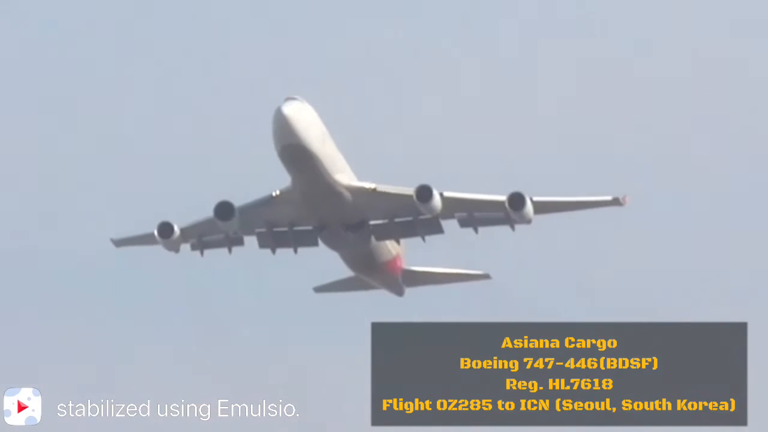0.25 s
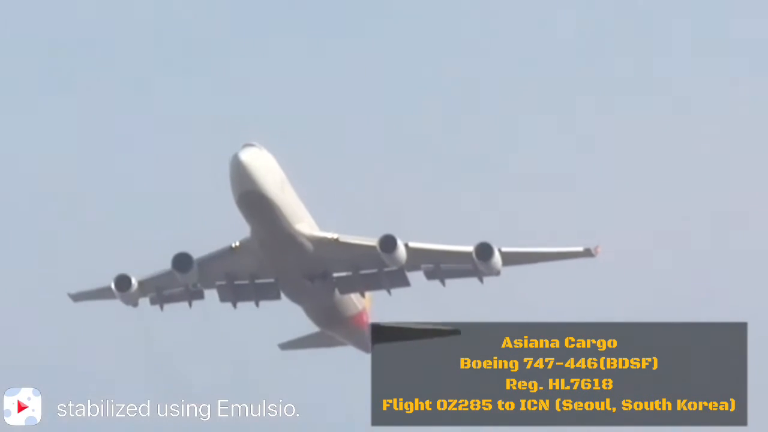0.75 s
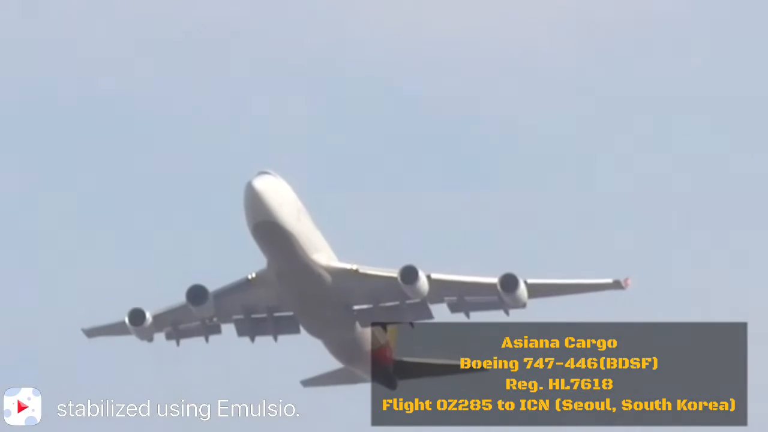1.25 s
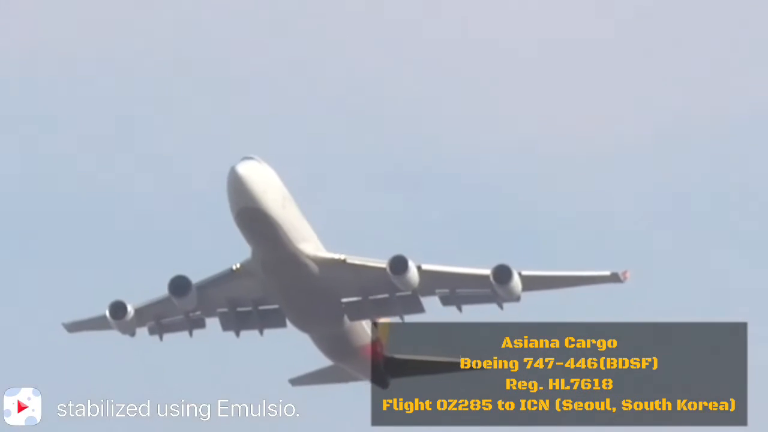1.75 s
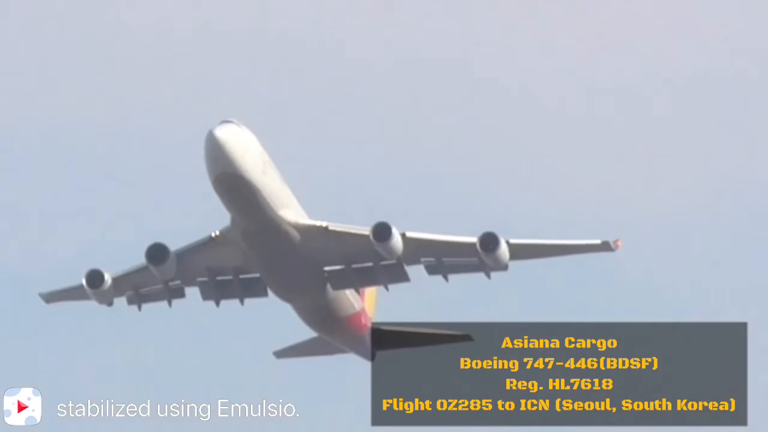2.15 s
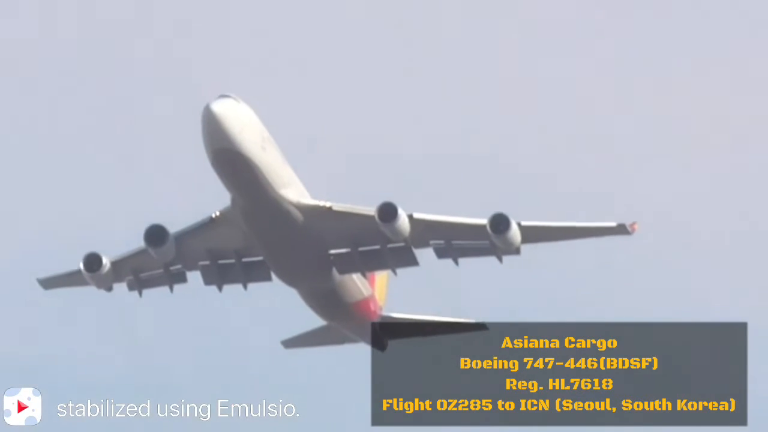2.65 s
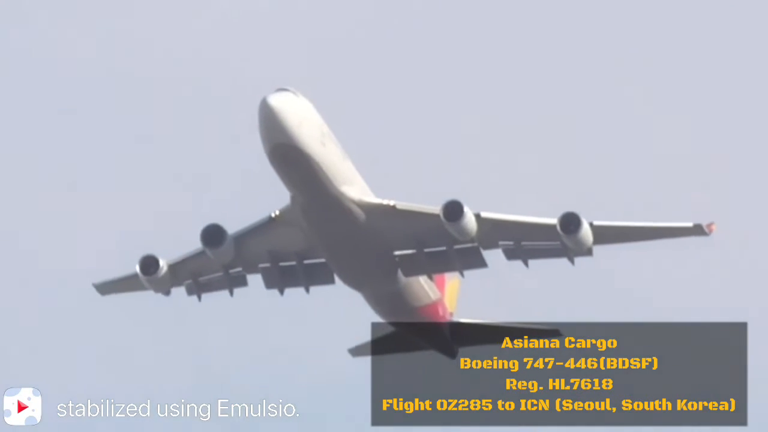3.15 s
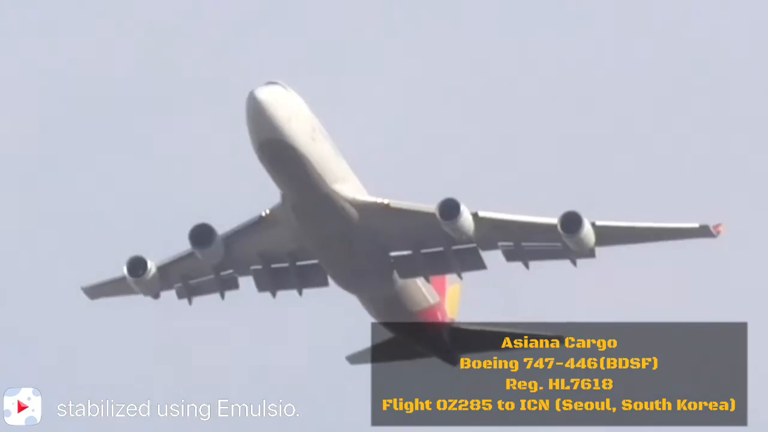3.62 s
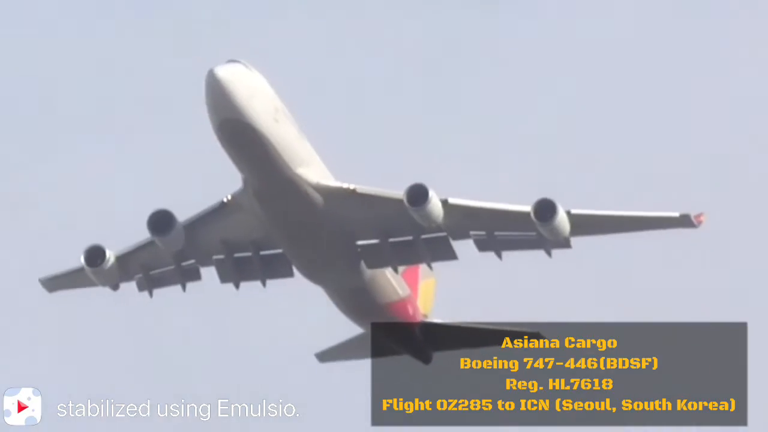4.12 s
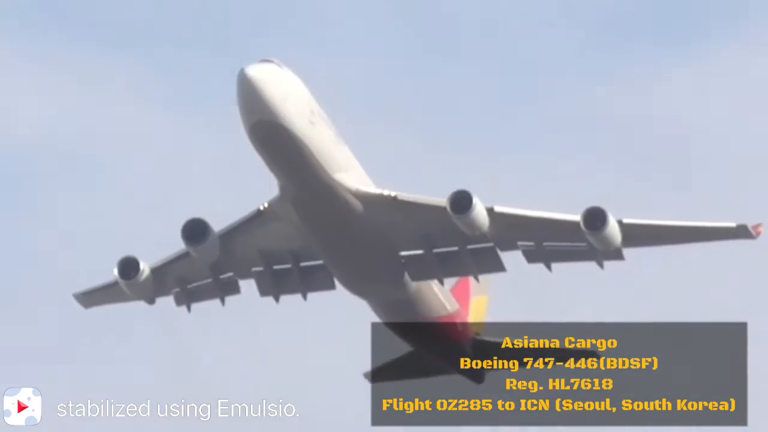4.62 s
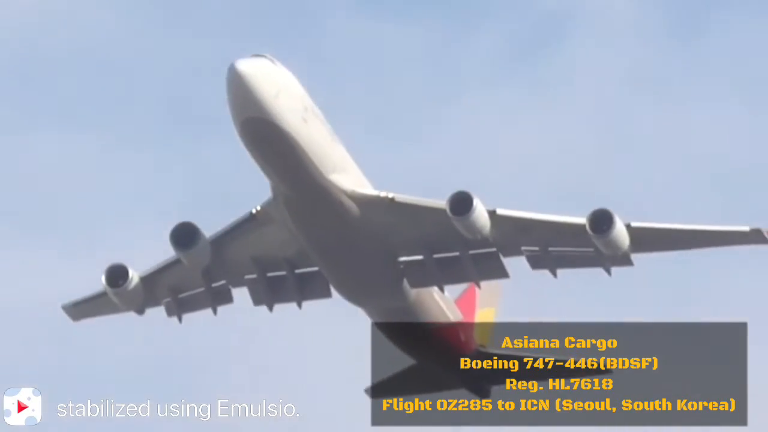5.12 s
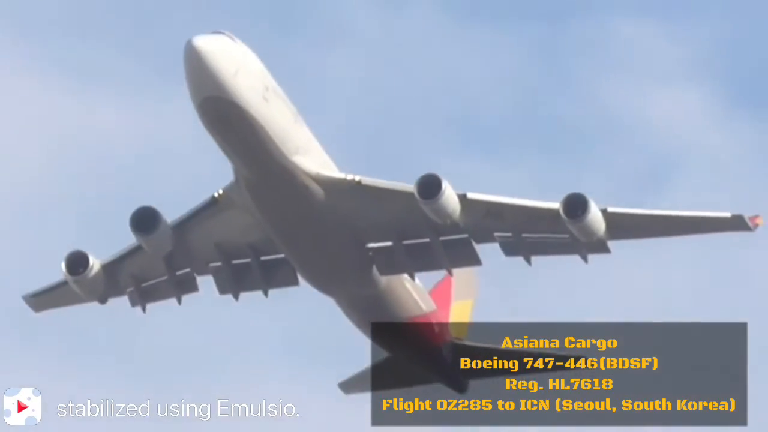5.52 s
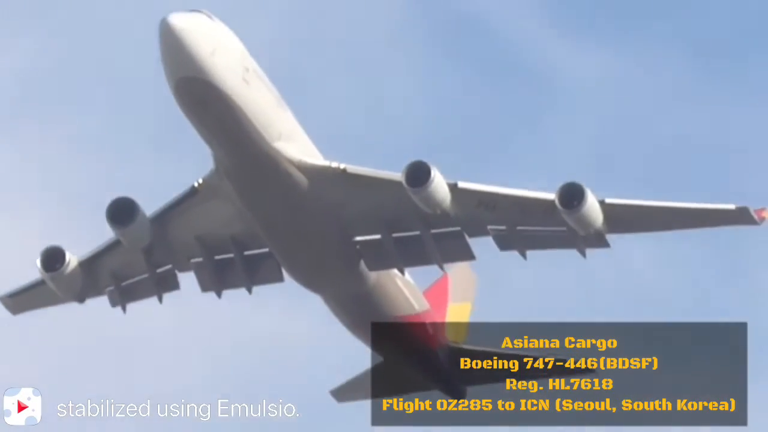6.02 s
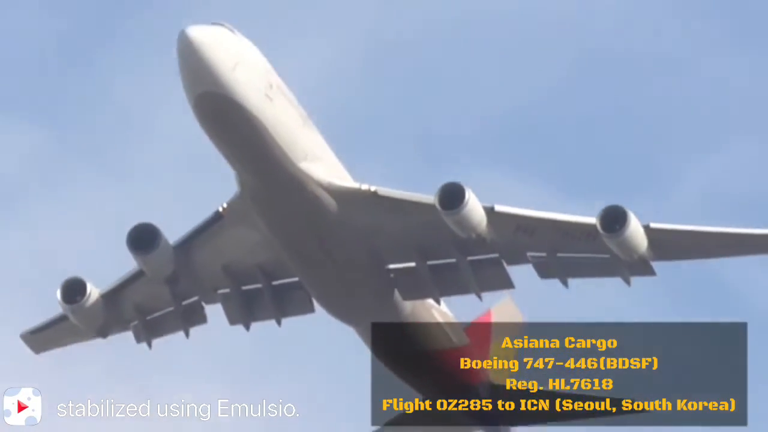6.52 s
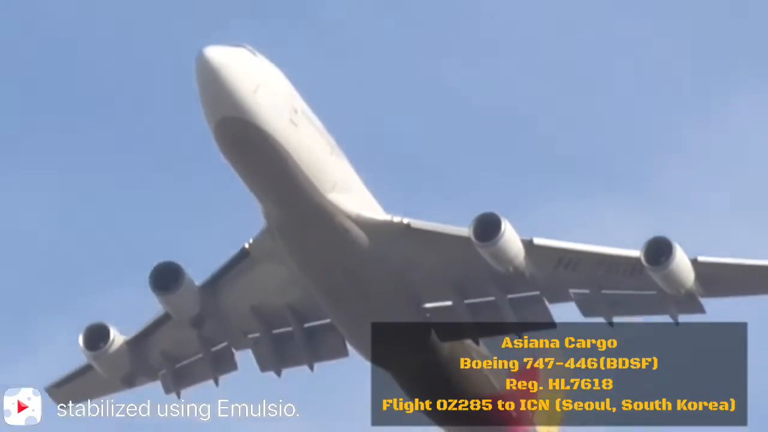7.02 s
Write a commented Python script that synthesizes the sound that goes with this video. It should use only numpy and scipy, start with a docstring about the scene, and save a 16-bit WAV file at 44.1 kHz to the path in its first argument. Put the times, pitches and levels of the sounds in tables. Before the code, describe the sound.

A large four-engine jet climbs toward a listener outdoors. In the first 0.2 seconds, three very faint, high falling chirps, perhaps a small bird, sit over a distant, muffled rumble slightly to the left. A low hum near 115 hertz beats in slow swells, dipping around 0.6 and 2.3 seconds and sagging a little in pitch. From about 2.5 seconds the roar thickens and moves to the centre; by 4 to 5 seconds it is heavy, deep and turbulent, with a shifting hollow colour from the ground echo. The hum fades near 4.3 and returns around 5. Tiny dry ticks fall at 5.05. Around 6 to 6.3 a brighter rush surges with faint mid and high turbine whines, which flicker again until 7.2. Thin hiss stays throughout, and the roar is still loud at the end.

```python
"""A jet's roar swells as the aircraft climbs towards a listener in the open and nears overhead.
The roar is one turbulent noise, split into bands that swell apart, with a ground echo a few milliseconds late.
A shaft hum, one tone under a beating level curve, sags in pitch; faint blade tones, sines, flare late.
Filtered noise gives a scattered roar and a thin hiss; swept sines give chirps, filtered impulses give ticks."""
import sys
import numpy as np
from scipy import signal
from scipy.fft import rfft, irfft, next_fast_len
from scipy.io import wavfile
from scipy.ndimage import uniform_filter1d, map_coordinates

SR = 44100
rng = np.random.default_rng(int(sys.argv[2]) if len(sys.argv) > 2 else 0)


def materialize(psi):
    """Save the field psi as 16-bit PCM at rate SR to the path in sys.argv[1].

    A 1-D psi becomes a single channel; in a 2-D psi each row is a channel.
    """
    bounded = np.clip(np.atleast_2d(psi).T, -1, 1)
    quanta = np.round(bounded * 32767).astype(np.int16)
    wavfile.write(sys.argv[1], SR, quanta)


def amplitude_ratio(level_db):
    """Convert a level in decibels to the matching linear amplitude (field) ratio."""
    exponent = np.asarray(level_db, float) / 20
    return 10 ** exponent


N = 320607

# Spectrum of the jet noise after the long way through air; each part is levelled later:
# (frequency [Hz], relative density [dB per Hz])
JET_SPECTRUM = [(15, -39), (30, -38), (55, -14.5), (90, -0.5), (180, 1), (300, 3.5), (500, -3.5),
                (800, -10.5), (1300, -23), (1700, -31), (2100, -28.5), (2300, -34), (2600, -40.5),
                (3200, -58.5), (5000, -78.5)]
# Where one part of the jet noise hands over to the next: (frequency [Hz])
HANDOVER_HZ = [60, 115, 215, 430, 972, 1290, 1680, 2250]
# The two deepest parts: (time [s], lowest throb [dB], deep rumble [dB])
DEEP_LEVELS = [(0, -51, -46), (.9, -53, -47.5), (2, -44, -43.5), (2.8, -41, -39.5), (3.3, -44, -39),
               (3.8, -46, -33), (4.3, -42, -32), (4.46, -46, -46), (4.65, -42, -36), (5.3, -40, -25.5),
               (6.05, -43, -29), (6.4, -41, -31), (7.2, -43, -30)]
# The middle parts: (time [s], exhaust boom [dB], exhaust rumble [dB], jet roar [dB], core rush [dB])
ENGINE_LEVELS = [(0, -44, -30, -30, -44), (.25, -35, -29.5, -25, -41.5), (.5, -39, -28, -30.5, -35.5),
                 (1.1, -36, -34.5, -30.5, -38.5), (1.75, -36.5, -30, -30, -35.5),
                 (2.05, -32, -28.5, -27, -36), (2.35, -34.5, -23, -24, -36), (2.8, -30.5, -27.5, -28, -34),
                 (3.3, -26, -26.5, -23, -38.5), (3.6, -31.5, -20.5, -24, -33.5),
                 (3.9, -23.5, -20, -21, -31), (4.5, -18.5, -23, -20, -30), (4.9, -20.5, -22.5, -20, -30),
                 (5.4, -23, -22.5, -22, -32), (5.85, -23.5, -22, -22, -34.5),
                 (6.1, -24.5, -25.5, -25.5, -27.5), (6.25, -26.5, -21, -18, -33),
                 (6.5, -25.5, -18.5, -19, -29.5), (6.9, -24, -19, -21.5, -32), (7.25, -21, -20.5, -21, -32)]
# The bright edge of the rush: (time [s], level [dB])
BRIGHT_LEVEL = [(0, -43.5), (1, -45.5), (2, -44.5), (3, -42), (3.9, -38.5), (4.6, -38.5), (5.3, -38),
                (5.9, -39.5), (6.4, -36.5), (6.8, -38), (7.27, -36)]
# The two top parts lie this far under the bright edge [dB]
TOP_UNDER_DB = (14, 17.5)
# Turbulent air shakes each part on its own, lowest part first: (depth [dB], rate [knots per s])
TURBULENT_SHAKE = [(.5, 5.6), (.5, 4.9), (.5, 7.2), (0.6, 17), (0.599, 13), (0.5, 10), (0.601, 12),
                   (.6, 12), (.6, 12)]
# One bright surge as the air briefly carries the treble better: time, standard deviation [s],
# lift of roar, rush, bright edge and the two top parts [dB]
SURGE_S, SURGE_SPREAD_S, SURGE_DB = 6.205, 0.055, (1.5, 6, 8, 9.5, 4.5)

# Ground echo, later as the aircraft rises and in step only for a while:
# (time [s], delay [ms], strength [0-1])
GROUND_ECHO = [(0, 1.6, .04), (3.8, 2.1, .1), (4.2, 2.28, .65), (4.6, 2.45, .7), (5.1, 2.78, .6),
               (5.5, 2.92, .7), (5.9, 3.1, .6), (6.3, 3.35, .65), (6.65, 3.5, .4), (6.9, 3.7, .15),
               (7.27, 3.9, .15)]
# Turbulent air makes the delay wander [ms, knots per s]; soft soil turns the phase back [rad]
ECHO_WANDER_MS, ECHO_WANDER_RATE, SOIL_LAG_RAD = .09, 7, 0.76

# Flares of the blade tones: (time [s], frequency [Hz], peak level [dB], standard deviation [s])
BLADE_FLARES = [(4.87, 1028, -41, .05), (5.95, 1022, -41, .08), (5.99, 2985, -63, .05),
                (6.06, 1100, -39, .07), (6.13, 1180, -40, .06), (6.17, 2985, -52.5, .025),
                (6.18, 2815, -61, .025), (6.2, 1100, -34, .06), (6.26, 1022, -35.5, .07),
                (6.27, 2985, -63, .025), (6.57, 2982, -60, .045), (6.62, 1022, -37, .05),
                (6.75, 2975, -61, .025), (6.91, 2978, -56, .035), (7.08, 2815, -64, .04),
                (7.15, 2992, -61, .06)]
# Faint fan whistle: frequency [Hz], level [dB], start of its one-second fade-in [s]
WHISTLE_HZ, WHISTLE_DB, WHISTLE_FROM_S = 2982, -75, 4.8

# Shaft hum, its beats included: (time [s], level [dB])
HUM_LEVEL = [(0, -31.5), (.45, -34), (.62, -45.5), (.78, -32.5), (1.05, -31), (1.25, -35.5), (1.5, -29),
             (2.1, -33), (2.32, -47), (2.55, -28), (3.3, -26), (3.55, -28), (3.85, -39), (4.3, -50),
             (4.65, -37), (4.9, -26), (5.1, -27.5), (5.35, -28.5), (5.95, -25.5), (6.3, -37), (7.2, -34)]
# Part of the hum that is opposite at the two ears: (time [s], level [dB])
HUM_OPPOSED = [(0, -61), (.5, -49), (.95, -64), (1.5, -53), (2.1, -40), (2.4, -48), (2.55, -64.5),
               (7.27, -64)]
# Sag from first to settled pitch [Hz, Hz], time constant [s]; phase lead of the left ear [rad]
HUM_START_HZ, HUM_SETTLED_HZ, HUM_SAG_S, HUM_LEAD_RAD = 117.3, 112.55, 1.1, -.05
# Pitch waver at first [Hz] and its growth as the aircraft nears [Hz per s]
HUM_WAVER_HZ, HUM_WAVER_HZ_PER_S = 0.24, 0.21
# Octave against the hum at first [dB] and its loss [dB per s]
OCTAVE_DB, OCTAVE_FADE_DB_PER_S = 0, 6
# Third harmonic: peak amplitude [dB], time [s], standard deviation [s]
THIRD_DB, THIRD_S, THIRD_SPREAD_S = -32, 2.82, .35

# Sound scattered by the surroundings: (time [s], level [dB])
SCATTER_LEVEL = [(0, -33), (1.5, -33.5), (3, -33), (4.5, -39.5), (5.5, -30), (6.3, -37.5), (7.27, -39.5)]
# Its spectral shape: (frequency [Hz], relative density [dB per Hz])
SCATTER_SPECTRUM = [(15, -55.5), (25, -20), (103, -15), (256, -4.5), (325, -1.5), (591, -1), (952, -3.5),
                    (1390, -8), (1760, -21.5), (2900, -29), (3770, -60), (6380, -120)]

# The aircraft starts off to the left: right ear late [ms], treble louder at the left [dB],
# until it is straight ahead [s]
LATE_MS, SHADOW_DB, AHEAD_S = .035, 3.2, 2.9

# Hiss before a common lift: (time [s], low part [dB], high part [dB])
HISS_LEVELS = [(0, -62, -63), (.9, -60.5, -60.5), (1.53, -57.5, -59.5), (2.24, -58, -62),
               (2.44, -56, -56.5), (3.55, -58, -57.5), (4.0, -57.5, -60.5), (4.25, -56, -60),
               (4.95, -57.5, -62.5), (5.8, -59.5, -62), (6.15, -58, -61), (6.4, -60.5, -64.5),
               (7.1, -58, -62), (7.25, -57, -58.5)]
# Spectral shape of the hiss at the left: (frequency [Hz], relative density [dB per Hz])
HISS_LEFT_SPECTRUM = [(1500, -29), (2600, 2.5), (3200, 2.5), (4000, 1), (5000, -4.5), (6000, -5.5),
                      (7500, -3.5), (9000, -10), (11000, -17.5), (13000, -23), (15500, -32)]
# Spectral shape of the hiss at the right: (frequency [Hz], relative density [dB per Hz])
HISS_RIGHT_SPECTRUM = [(1500, -26), (2600, 1.5), (3200, 4), (4000, -1.5), (5000, -8.5), (6000, -16.5),
                       (7500, -9), (9000, -9.5), (11000, -18), (13000, -21), (15500, -28)]
# Left-right likeness of the noise behind the hiss: (frequency [Hz], correlation)
HISS_LIKENESS = [(2500, .7), (4000, 0.27), (5500, .2), (7500, 0.4), (9000, .1), (11000, .1), (14000, .3)]
# The hiss leans left at first (low, high part [dB]) and centres between these times [s]
LEAN_LOW_DB, LEAN_HIGH_DB, CENTRES_S = 5.5, 2.5, (2, 3.6)

# Small close ticks: (time [s], impulse height before filtering [dB])
TICK_IMPULSES = [(5.0465, -26.5), (5.0485, -32), (5.0515, -25.5)]
# Faint high chirps, perhaps a small bird:
# (time [s], length [s], first frequency [Hz], last frequency [Hz], level [dB])
CHIRP_SWEEPS = [(.008, .09, 10800, 10450, -72.5), (.09, .035, 11100, 10800, -69),
                (.195, .025, 8500, 8250, -68)]


def unit(x):
    """Normalisation: scaled to rms 1 along time."""
    return x / np.sqrt(np.mean(x ** 2, axis=-1, keepdims=True) + 1e-20)


def along(points, hz):
    """Interpolation of (frequency, value) points on a logarithmic frequency axis."""
    f, v = np.transpose(points)
    return np.interp(np.log(hz + 1), np.log(f + 1), v)


def seconds():
    """Time of every sample."""
    return np.arange(N) / SR


def curves(rows):
    """Linear interpolation in time: one value per sample for each column after the time."""
    s, *columns = np.transpose(rows)
    return [np.interp(seconds(), s, column) for column in columns]


def bump(s, spread_s):
    """Gaussian bell of height 1 in time."""
    return np.exp(-((seconds() - s) / spread_s) ** 2 / 2)


def wobble(rate):
    """Smooth random modulation: a spline through random knots, rate knots a second."""
    knots = rng.standard_normal(int(N * rate / SR) + 4)
    return map_coordinates(knots, [np.arange(N) * rate / SR])


def filtered(x, response):
    """Linear filtering: the spectrum of x times a response of frequency."""
    m = next_fast_len(N + 8192)
    return irfft(rfft(x, m) * response(np.fft.rfftfreq(m, 1 / SR)), m)[..., :N]


def above(hz, edge_hz, steep):
    """High-pass gain: a smooth step from 0 to 1 at the edge."""
    return 1 - 1 / (1 + (hz / edge_hz) ** steep)


def delayed(x, ms):
    """Propagation delay: x heard ms later; the delay may glide."""
    return map_coordinates(x, [np.arange(N) - ms * SR / 1000], order=3, mode="reflect")


def patchy(patchy_db, channels):
    """White noise whose gain drifts in patches of pitch and time, as turbulent air does to far sound."""
    z = signal.stft(rng.standard_normal((channels, N)), nperseg=512)[2]
    field = uniform_filter1d(rng.standard_normal(z.shape[1:]), size=5, axis=0)
    field = uniform_filter1d(field, size=14, axis=1)
    return signal.istft(z * amplitude_ratio(patchy_db * field / field.std()), nperseg=512)[1][:, :N]


def jet():
    """Turbulent mixing noise: parts of one noise, deep to top, swell apart as angle and air change."""
    noise = filtered(patchy(patchy_db=0.61, channels=1)[0], lambda hz: amplitude_ratio(along(JET_SPECTRUM, hz)))
    noise = with_ground(noise)
    # differences of successive low-passes are the bands
    lows = [filtered(noise, lambda hz: 1 - above(hz, edge, steep=8.55)) for edge in HANDOVER_HZ]
    parts = np.diff([0 * noise, *lows, noise], axis=0)
    lower_db = curves(DEEP_LEVELS) + curves(ENGINE_LEVELS)
    bright_db = curves(BRIGHT_LEVEL)[0]
    top_db = [bright_db - db for db in TOP_UNDER_DB]
    level_db = np.array([*lower_db, bright_db, *top_db])
    level_db += [depth_db * wobble(rate) for depth_db, rate in TURBULENT_SHAKE]
    level_db[4:] += np.outer(SURGE_DB, bump(SURGE_S, SURGE_SPREAD_S))
    return np.sum(unit(parts) * amplitude_ratio(level_db), axis=0)


def with_ground(x):
    """Ground reflection: a later copy interferes; rough soil keeps only its low part in step."""
    delay_ms, strength = curves(GROUND_ECHO)
    delay_ms = delay_ms + ECHO_WANDER_MS * wobble(ECHO_WANDER_RATE)
    soil = lambda hz: np.exp(-1j * SOIL_LAG_RAD) * (1 - above(hz, 760, steep=5.9))
    echo = filtered(delayed(x, delay_ms), soil)
    return (x + strength * echo) / np.sqrt(1 + strength ** 2)


def whistle():
    """Blade-passing tones: they flare as the air bends their path, over one faint wavering whistle."""
    waver = 1 + .001 * wobble(30)
    tone = lambda hz: np.sqrt(2) * np.sin(2 * np.pi * hz * np.cumsum(waver) / SR)
    fade_in = np.clip(seconds() - WHISTLE_FROM_S, 0, 1)
    faint = amplitude_ratio(WHISTLE_DB + 2.7 * wobble(6.3)) * fade_in * tone(WHISTLE_HZ)
    flares = sum(amplitude_ratio(db) * bump(s, spread_s) * tone(hz) for s, hz, db, spread_s in BLADE_FLARES)
    return amplitude_ratio(1.1 * wobble(25)) * (faint + flares)


def hum():
    """Beats of shafts of near-equal speed, drawn as a level curve on one low tone with harmonics."""
    hz = HUM_SETTLED_HZ + (HUM_START_HZ - HUM_SETTLED_HZ) * np.exp(-seconds() / HUM_SAG_S)
    hz = hz + (HUM_WAVER_HZ + HUM_WAVER_HZ_PER_S * seconds()) * wobble(5.6)
    phase = 2 * np.pi * np.cumsum(hz) / SR + np.array([[HUM_LEAD_RAD], [-HUM_LEAD_RAD]]) / 2
    octave = amplitude_ratio(OCTAVE_DB - OCTAVE_FADE_DB_PER_S * seconds()) * np.sin(2 * phase)
    opposed = np.sqrt(2) * amplitude_ratio(curves(HUM_OPPOSED)[0]) * [[-1], [1]] * np.sin(phase.mean(axis=0) + .6)
    third = amplitude_ratio(THIRD_DB + 3.6 * wobble(4.44)) * bump(THIRD_S, THIRD_SPREAD_S) * np.sin(3 * phase)
    level = np.sqrt(2) * amplitude_ratio(curves(HUM_LEVEL)[0] + 1.1 * wobble(6.4))
    return level * (np.sin(phase) + octave) + third + opposed


def scattered():
    """Diffuse field: roar that arrives from all around, unrelated noise at each ear."""
    noise = filtered(patchy(patchy_db=1.5, channels=2), lambda hz: amplitude_ratio(along(SCATTER_SPECTRUM, hz)))
    return amplitude_ratio(curves(SCATTER_LEVEL)[0]) * unit(noise)


def at_two_ears(aircraft, around):
    """Interaural differences: the left ear hears first and brighter until the source is straight ahead."""
    treble = filtered(aircraft, lambda hz: above(hz, 700, steep=8))
    aside = np.array([[.5], [-.5]]) * np.clip(1 - (seconds() / AHEAD_S) ** 2, 0, 1)
    shaded = aircraft - treble + (treble + around) * amplitude_ratio(SHADOW_DB * aside)
    ears = np.array([delayed(ear, -LATE_MS * side) for ear, side in zip(shaded, aside)])
    return ears * amplitude_ratio([[-.2], [.2]])  # slight fixed balance to the right, dB


def hiss():
    """Partially correlated noise: a thin hiss partly shared by both ears, low and high part moving apart."""
    low_db, high_db = curves(HISS_LEVELS)
    # mid and side weights cos and sin of this angle give the wanted correlation
    angle = lambda hz: np.arccos(np.clip(along(HISS_LIKENESS, hz), -1, 1)) / 2
    noise = patchy(patchy_db=0.95, channels=2)
    mid, side = filtered(noise, lambda hz: np.array([np.cos(angle(hz)), np.sin(angle(hz))]))
    shapes = lambda hz: amplitude_ratio([along(HISS_LEFT_SPECTRUM, hz), along(HISS_RIGHT_SPECTRUM, hz)])
    pair = filtered(np.array([mid + side, mid - side]), shapes)
    high = filtered(pair, lambda hz: above(hz, 4980, steep=8))
    lean = np.array([[.5], [-.5]]) * np.interp(seconds(), CENTRES_S, [1, 0])
    low_db = low_db + 0.6 * wobble(10.0) + LEAN_LOW_DB * lean
    high_db = high_db + .7 * wobble(22) + LEAN_HIGH_DB * lean
    lift = amplitude_ratio(2.5 + .6 * wobble(11))
    return lift * (amplitude_ratio(low_db) * unit(pair - high) + amplitude_ratio(high_db) * unit(high))


def chirps():
    """Frequency-swept sines: thin falling whistles with soft ends."""
    out = np.zeros(N)
    for s, length_s, from_hz, to_hz, db in CHIRP_SWEEPS:
        hz = np.linspace(from_hz, to_hz, round(length_s * SR))
        sweep = np.sqrt(2) * amplitude_ratio(db) * np.sin(2 * np.pi * np.cumsum(hz) / SR)
        out[round(s * SR):][:len(hz)] += signal.windows.tukey(len(hz), .5) * sweep
    return out


def ticks():
    """Band-passed impulses: tiny dry clicks of treble."""
    out = np.zeros(N)
    for s, db in TICK_IMPULSES:
        out[round(s * SR)] = amplitude_ratio(db)
    return filtered(out, lambda hz: above(hz, 3000, steep=3) * (1 - above(hz, 9500, steep=4)))


def scene():
    """Superposition of the aircraft at two ears, its hum, the hiss, the ticks and the chirps."""
    aircraft = jet() + whistle()
    return at_two_ears(aircraft, scattered()) + hum() + hiss() + ticks() + chirps()


def band_limit(x):
    """A steep low-pass at the top of the band."""
    return signal.sosfilt(signal.butter(12, 15140, fs=SR, output="sos"), x)


def record(dry):
    """The finished mix, as it is stored."""
    return band_limit(dry)


dry = scene()
out = record(dry)
materialize(out)
```